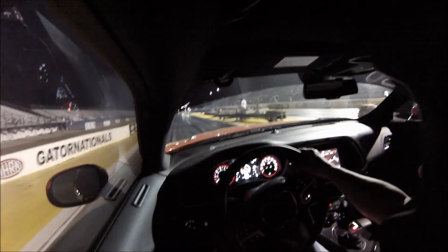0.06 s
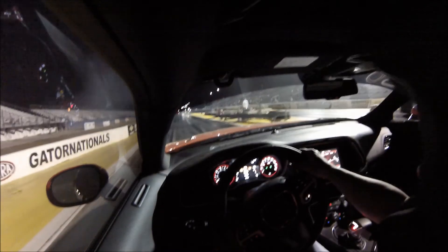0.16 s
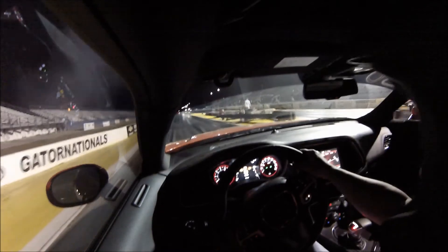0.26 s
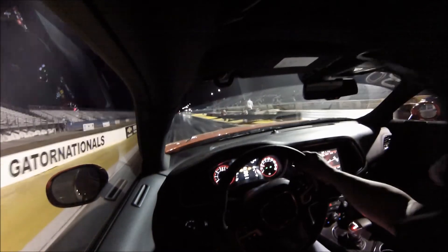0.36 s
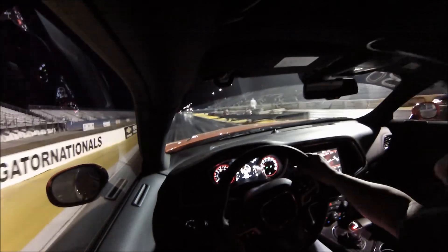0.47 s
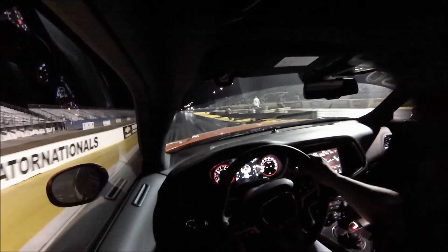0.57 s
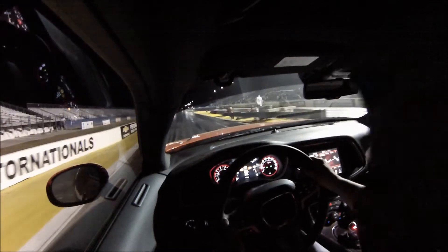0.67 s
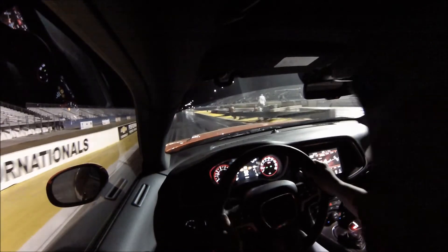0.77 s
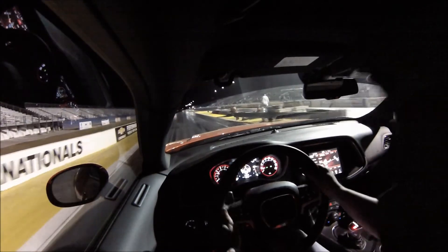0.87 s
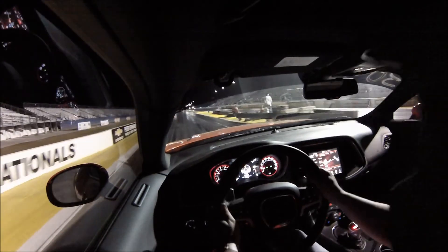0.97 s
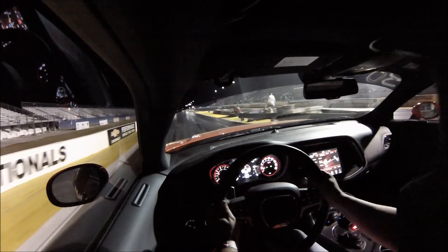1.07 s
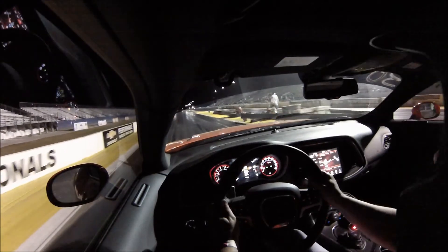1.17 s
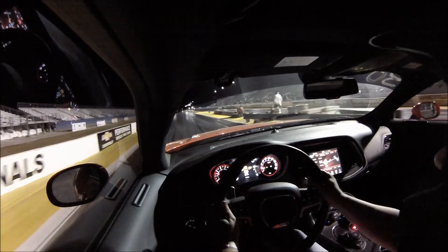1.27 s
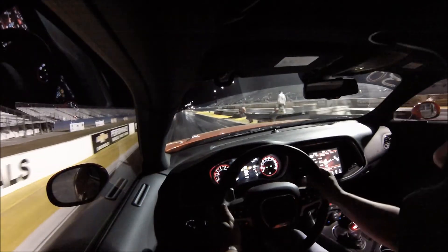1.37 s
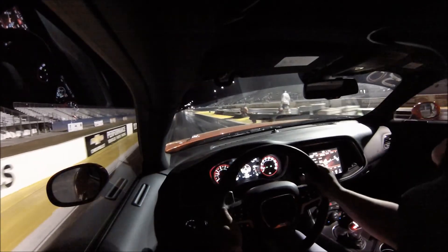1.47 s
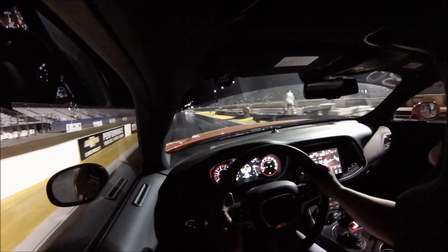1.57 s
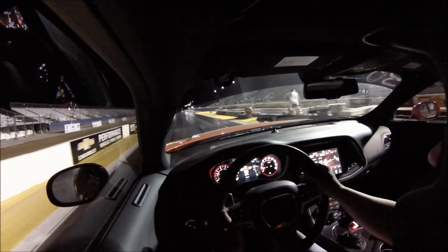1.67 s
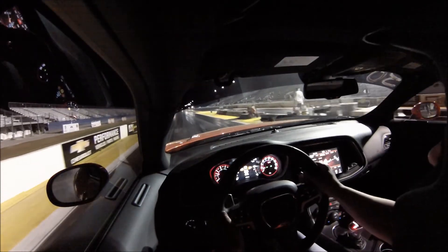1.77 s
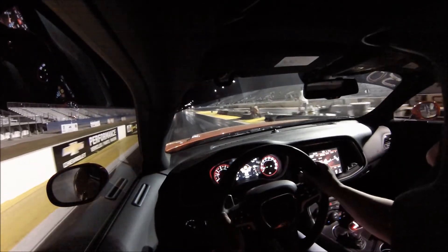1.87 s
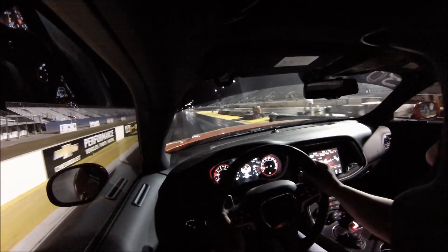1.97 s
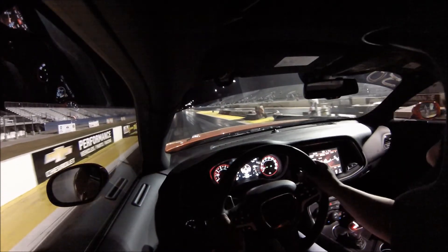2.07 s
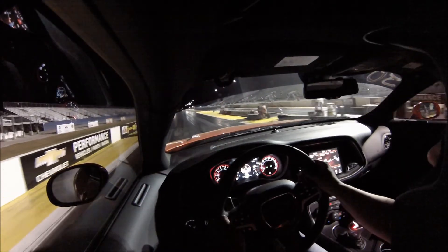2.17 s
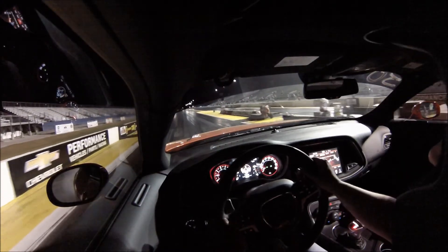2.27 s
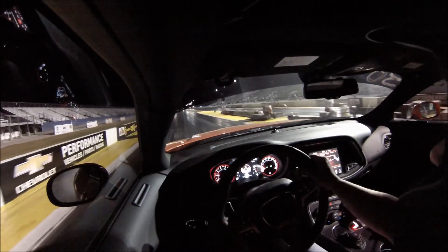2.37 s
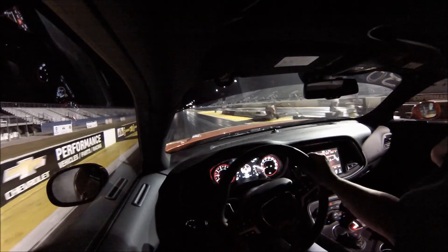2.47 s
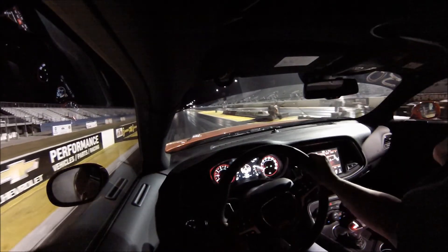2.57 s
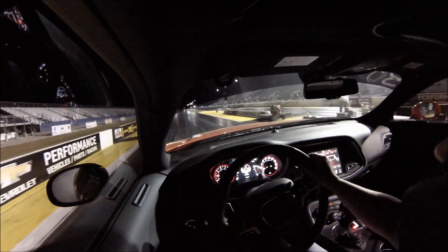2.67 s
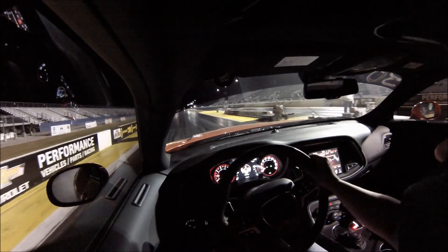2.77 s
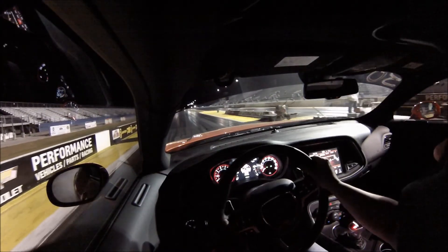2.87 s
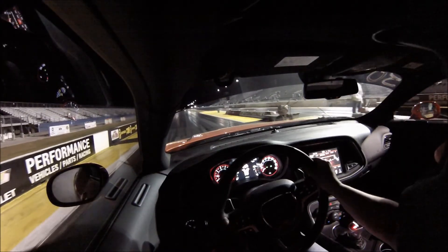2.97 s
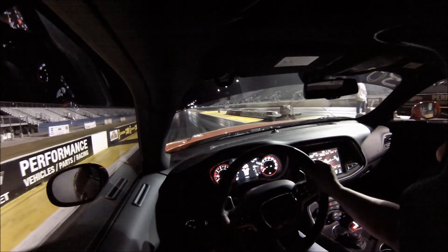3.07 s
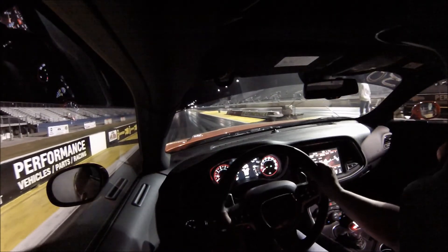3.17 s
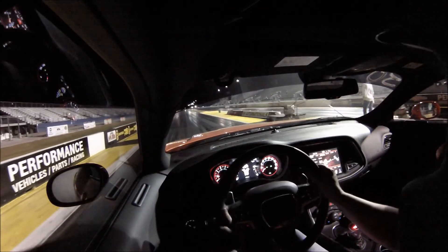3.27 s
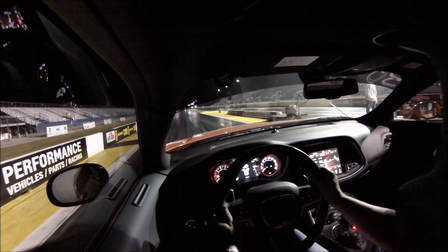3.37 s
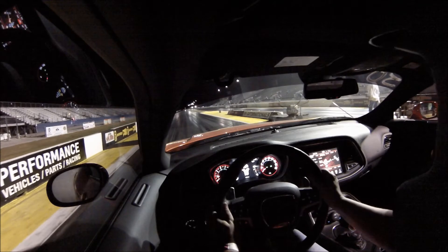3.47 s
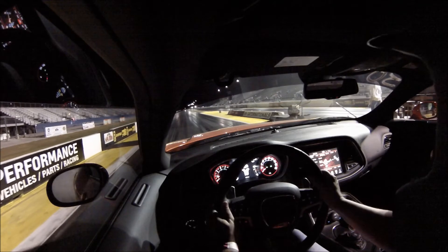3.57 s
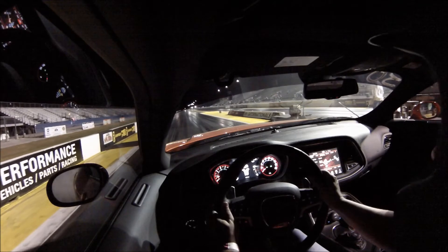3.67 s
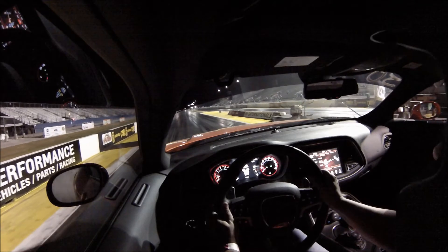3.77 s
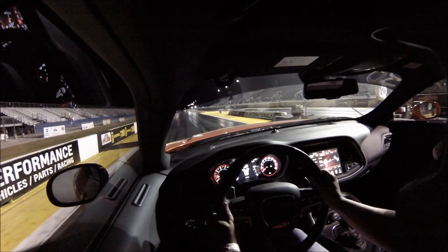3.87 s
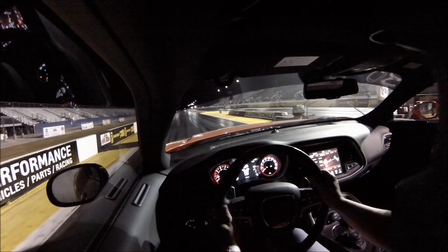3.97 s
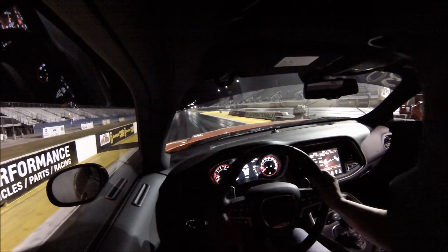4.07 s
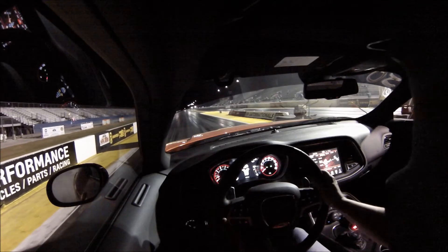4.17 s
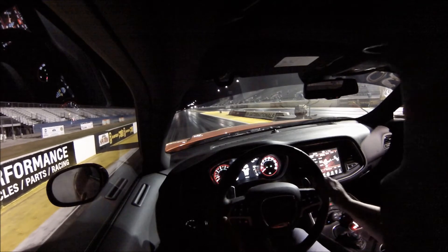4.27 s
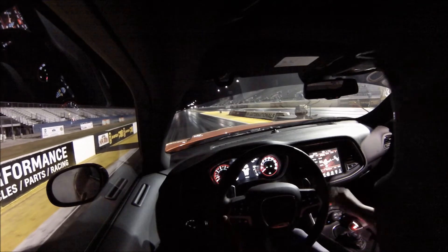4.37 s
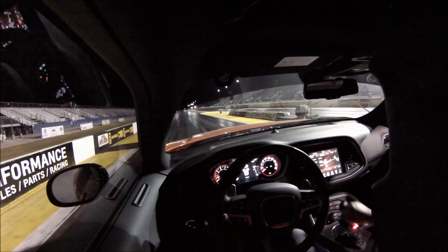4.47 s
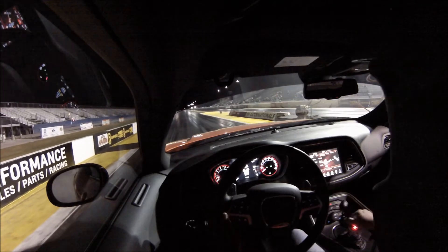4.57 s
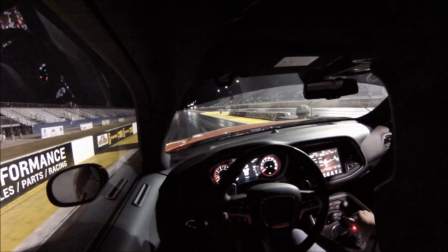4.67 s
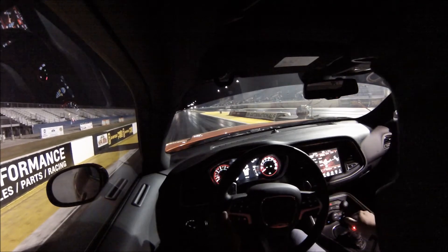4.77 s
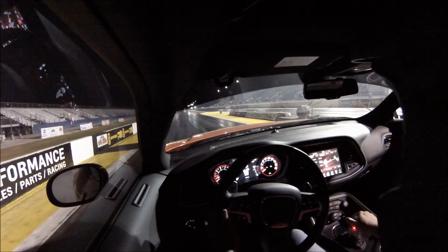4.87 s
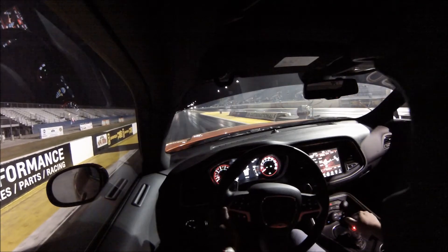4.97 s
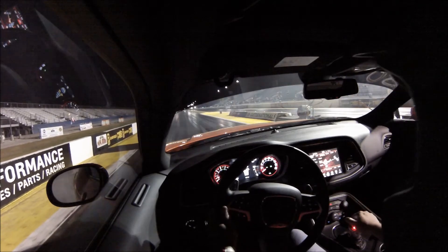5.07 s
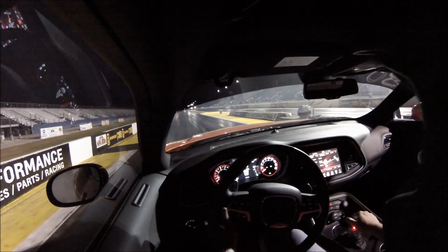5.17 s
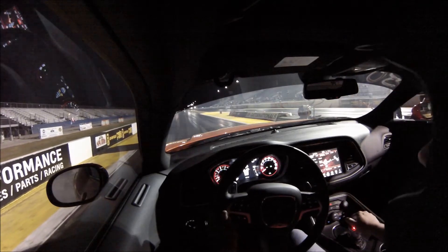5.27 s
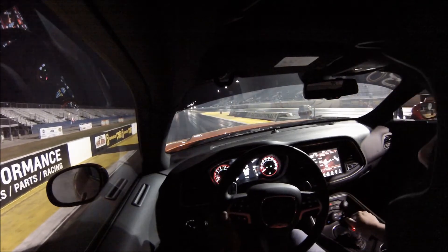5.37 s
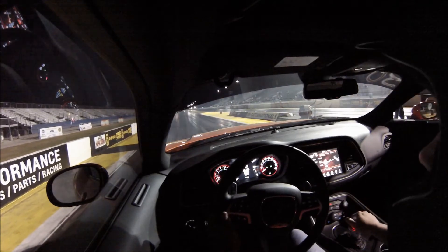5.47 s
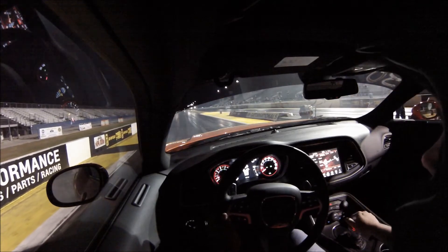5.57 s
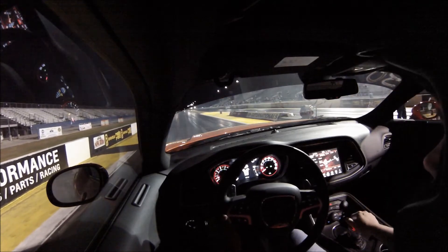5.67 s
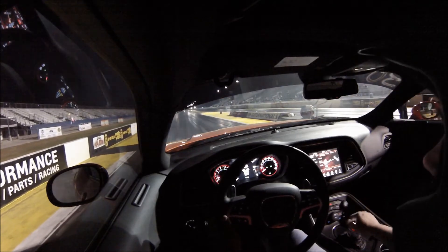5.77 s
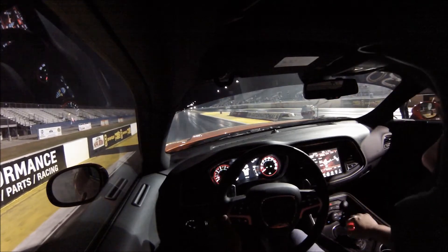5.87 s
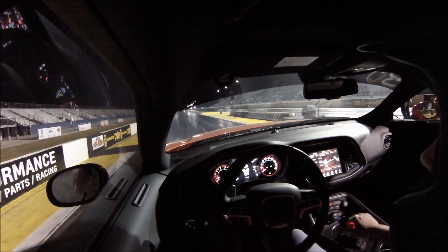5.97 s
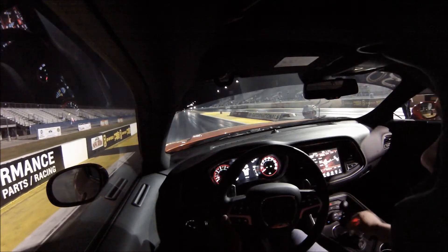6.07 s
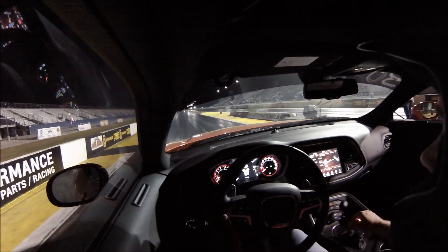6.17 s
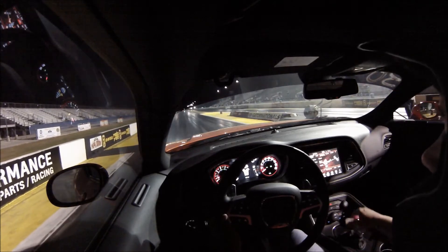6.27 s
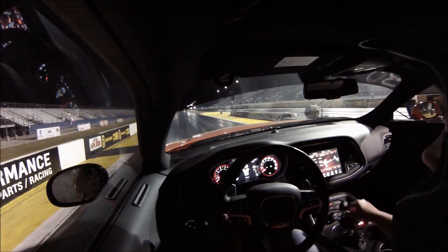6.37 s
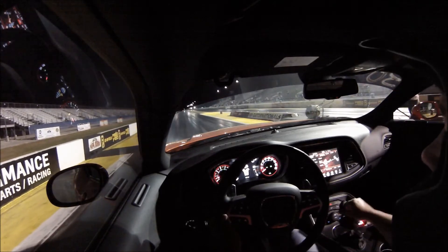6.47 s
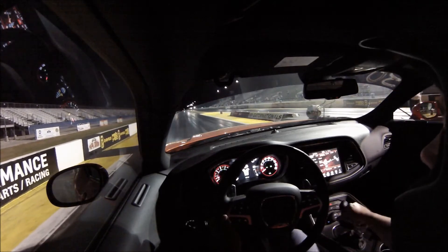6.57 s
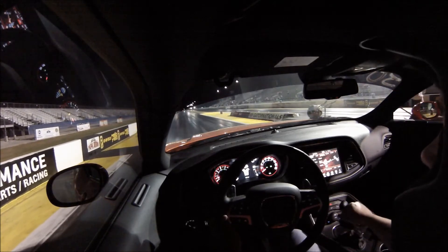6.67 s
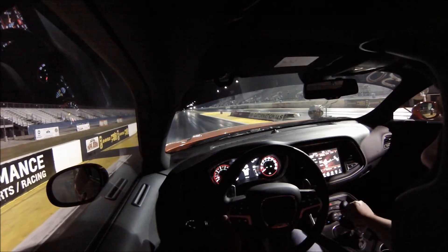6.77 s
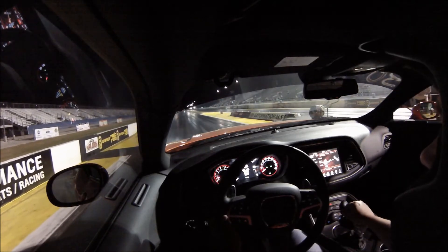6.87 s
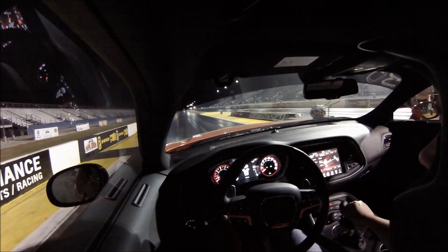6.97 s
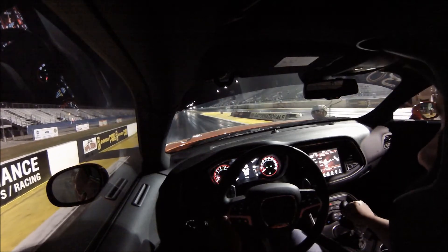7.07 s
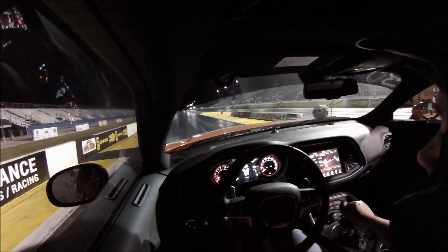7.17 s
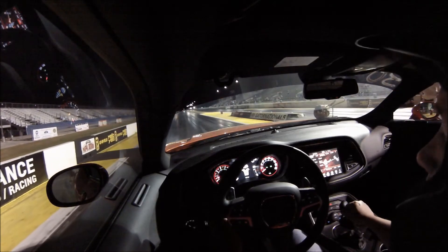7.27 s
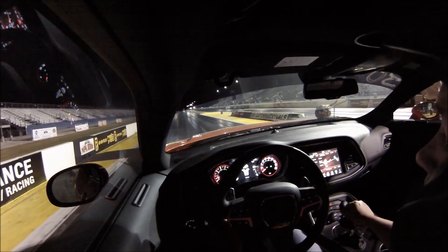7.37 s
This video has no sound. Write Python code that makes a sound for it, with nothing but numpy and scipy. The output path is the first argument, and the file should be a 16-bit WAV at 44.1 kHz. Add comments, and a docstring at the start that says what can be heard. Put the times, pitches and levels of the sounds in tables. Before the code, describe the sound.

Inside a closed V8 car at night on a drag strip, a wavering tyre squeal with rubber scrub ends abruptly as the tyres grip. The high engine growl plunges, blips once, and slides down to a lumpy low idle. A brief gear whine falls as the car slows; later come soft hand rubs, exhaust ticks and lever clicks. The microphone sits in the cabin, with bass muffled and heavy.

```python
"""Closed cabin of a V8 car at the end of a burnout: two tyres squeal and grip, then the car rolls out.
The engine, tonal orders under pulsed and shaped noise, drops, blips once and sinks to a loping idle.
The squeal is wavering harmonics over scrub noise; the gear whine is a set of falling sine tones.
Grainy noise is the driver's hand sliding off the wheel, short bursts are clicks of trim and lever,
bright bursts are exhaust ticks, and a faint steady hiss is cabin air and microphone."""
import sys
import numpy as np
from scipy import signal
from scipy.fft import rfft, irfft, next_fast_len
from scipy.io import wavfile
from scipy.ndimage import uniform_filter1d

SR = 44100
rng = np.random.default_rng(int(sys.argv[2]) if len(sys.argv) > 2 else 0)


def dump_mix(stems):
    """Bounce the given channels to the path in sys.argv[1] as a 16-bit WAV at rate SR."""
    frames = np.atleast_2d(stems).T  # one column per channel
    limited = np.clip(frames, -1, 1)  # hard clip at full scale
    pcm = np.round(limited * 32767).astype(np.int16)
    wavfile.write(sys.argv[1], SR, pcm)


def invert_db(x):
    """Field ratio 10**(x/20) for x, a level in decibels (scalar or array-like)."""
    u = np.asarray(x, float) / 20
    return 10 ** u


N = 327222   # samples


def seconds():
    """Time of every sample in s."""
    return np.arange(N) / SR


def rms_one(x):
    """Scale to unit power."""
    return x / np.sqrt(np.mean(x ** 2) + 1e-20)


def in_time(rows):
    """Automation lanes: each column of a timed table, interpolated to every sample."""
    s, *columns = np.transpose(rows)
    return [np.interp(seconds(), s, column) for column in columns]


def inside(start_s, end_s, edge_s):
    """Gate: one between two times, with soft ends."""
    t = seconds()
    return np.clip(np.minimum(t - start_s, end_s - t) / edge_s + .5, 0, 1) ** 2


def swells(rows):
    """Sum of bell-shaped gains around given times."""
    t = seconds()
    return sum(invert_db(level_db) * np.exp(-.5 * ((t - s) / (length_s / 2)) ** 2)
               for s, length_s, level_db in rows)


def drift(rate_hz):
    """Slow random modulation of spread 1: noise through a double pole at rate_hz."""
    r = np.exp(-40 * np.pi * rate_hz / SR)   # runs on every 20th sample
    noise = rng.standard_normal(N // 20 + 2002)
    slow = signal.lfilter([1], [1, -2 * r, r * r], noise)[2000:]
    return np.interp(np.arange(N) / 20, np.arange(len(slow)), rms_one(slow))


def coloured(x, spectrum):
    """Shape a flat signal by a spectrum; rms 1."""
    hz, level_db = np.transpose(spectrum)
    size = next_fast_len(N)
    grid = np.fft.rfftfreq(size, 1 / SR) + 1   # offset keeps the logarithm finite
    gain = invert_db(np.interp(np.log(grid), np.log(hz), level_db, left=-90, right=-90))
    return rms_one(irfft(rfft(x, size) * gain, size)[:N])


def resonate(x, hz, width_hz):
    """Two-pole resonance, gain 1 on top."""
    r = np.exp(-np.pi * width_hz / SR)
    poles = [1, -2 * r * np.cos(2 * np.pi * hz / SR), r * r]
    return signal.lfilter([(1 - r * r) / 2, 0, (r * r - 1) / 2], poles, x + 1e-18)


def resonate_twice(x, hz, width_hz):
    """Two equal resonances in series, for steeper skirts."""
    return resonate(resonate(x, hz, width_hz), hz, width_hz)


def evened(x, size):
    """Take out the deepest swells and dips of a narrow noise."""
    x = rms_one(x)
    return x / np.sqrt(uniform_filter1d(x ** 2, size=size) + .15)


# colour of cabin air and microphone: f/Hz, level/dB per Hz (relative)
HISS_COLOUR = [(500, -13.5), (1000, 12), (2000, 7.5), (3300, 5), (3600, 4.5), (6000, 1.5), (9000, -1.5),
               (12500, -4), (13000, -10), (13200, -58.5)]
HISS_DB = -81


def hiss():
    """Steady coloured noise of cabin air and microphone."""
    return invert_db(HISS_DB) * coloured(rng.standard_normal(N), HISS_COLOUR)


# hand and sleeve strokes: t/s, length/s, level/dB
RUBS = [(3.903, 0.23, -74), (4.132, 0.144, -76.5), (4.524, .09, -85), (5.778, 0.087, -77), (6.09, .06, -78)]
# colour of skin and cloth: f/Hz, level/dB per Hz (relative)
RUB_COLOUR = [(1500, -15), (3000, -5.5), (4500, -3.5), (6000, -2), (8000, -8.5), (12000, -8.5),
              (15000, -16), (15600, -38)]
RUB_EDGE_S = 0.014
RUB_RISE_DB = 15.5   # growth towards the end of a 0.28 s stroke; in proportion for other lengths


def rubbing():
    """Grainy bright noise while skin and cloth slide, growing towards the end of each stroke."""
    grain_db = 1.2 * drift(200) + .8 * drift(30)
    grain = coloured(rng.standard_normal(N) * invert_db(grain_db), RUB_COLOUR)
    t, level = seconds(), 0
    for s, length_s, level_db in RUBS:
        to_go = np.clip(1 - (t - s) / length_s, 0, 1)
        stroke_db = level_db - RUB_RISE_DB * to_go ** 2 * length_s / 0.28
        level = level + invert_db(stroke_db) * inside(s, s + length_s, RUB_EDGE_S)
    return grain * level


# clicks of trim and lever: t/s, crack level/dB, knock level/dB, knock f/Hz
CLICKS = [(0.38, -67, -59, 4030), (0.407, -75, -61.5, 3280), (0.429, -74, -72, 3714),
          (1.032, -78, -89, 900), (1.141, -77, -92, 904), (1.497, -70.5, -90, 912),
          (2.11, -74.5, -93.5, 900), (2.275, -79, -92, 900), (2.307, -80, -90, 899),
          (2.338, -72, -69, 2016), (3.383, -82, -58.5, 986), (5.79, -73, -70, 2500),
          (5.936, -71, -72, 2500), (5.947, -58.5, -72, 4293), (5.996, -79, -77, 4050),
          (6.076, -69.5, -81, 2783), (6.089, -78, -65, 2515), (6.107, -90, -45, 240), (6.11, -67, -55, 542),
          (6.112, -88, -64, 2330), (6.148, -79, -90, 2594)]
RING_HZ = 5570   # plastic ring of every crack
KNOCK_S, KNOCK_CYCLES = .007, 2   # decay time constant: this time plus this many knock cycles


def clicks():
    """A bright crack with a short plastic ring, and a duller knock of tone and narrow noise."""
    out, t = np.zeros(N), np.arange(2600) / SR
    bright = signal.butter(2, [3500, 15000], "band", fs=SR, output="sos")
    noises = rng.standard_normal((len(CLICKS), len(t)))
    for (s, crack_db, knock_db, knock_hz), noise in zip(CLICKS, noises):
        ring = rms_one(resonate(noise, RING_HZ, 800))
        crack = (signal.sosfilt(bright, noise) + ring) * np.exp(-t / .0035)
        thud = .6 * rms_one(resonate(noise, knock_hz, knock_hz / 4))
        knock_fade = np.exp(-t / (KNOCK_S + KNOCK_CYCLES / knock_hz))
        onset = np.minimum(t / .002, 1)
        knock = (np.sin(2 * np.pi * knock_hz * t) + thud) * knock_fade * onset
        at = round(s * SR)
        out[at:at + len(t)] += invert_db(crack_db) * crack + invert_db(knock_db) * knock
    return out


# swells of single mesh tones: t/s, length/s, multiple of the shaft rate, level/dB
WHINES = [(.5, .16, 6, -74), (.76, .06, 6, -75), (1.01, .07, 6, -75), (1.17, .08, 6, -81),
          (.51, .06, 7, -79), (.66, .06, 7, -80), (.97, .1, 7, -77), (.51, .05, 8, -78), (.64, .06, 8, -80),
          (.76, .05, 8, -80), (.96, .12, 8, -81), (1.26, .07, 8, -78)]
SHAFT_HZ, SHAFT_HZ_PER_S = 259, 64.5   # shaft rate at zero time, and its fall while rolling out
WHINE_DB = -89   # each tone between swells


def gears():
    """Mesh tones of a slowing shaft fall with road speed, each with brief swells of its own, some together."""
    shaft_hz = SHAFT_HZ - SHAFT_HZ_PER_S * seconds()
    phase = 2 * np.pi * np.cumsum(shaft_hz) / SR
    out, rolling = 0, invert_db(WHINE_DB) * inside(.4, 1.33, .1)
    for mesh in sorted({row[2] for row in WHINES}):
        rows = [(s, length_s, level_db) for s, length_s, multiple, level_db in WHINES if multiple == mesh]
        out = out + (rolling + swells(rows)) * np.sin(mesh * phase)
    return out


# colour of scrubbing rubber: f/Hz, level/dB per Hz (relative)
SCRUB_COLOUR = [(250, -3.5), (420, -0.5), (600, 6.5), (900, -5.5), (1500, -47), (1900, -5), (2500, -6.5),
                (3000, -16), (4000, -36), (7000, -58), (10000, -59.5)]
# panels shaken by the spinning wheels: f/Hz, width/Hz, level/dB (relative)
HUMS = [(97, 8.3, -20), (232, 10, -6), (420, 14, 4), (455, 12, -2), (545, 14, -8)]
SCRUB_DB, SCRUB_DB_PER_S, SCRUB_ENDS_S = -56.5, 23, 0.64   # at zero time; fade; end
HUM_DB, HUM_DB_PER_S = -50, 55   # at zero time; the panel hums fade faster than the scrub


def scrub():
    """Broad noise of rubber tearing over the track, and narrow noise from the panels it shakes."""
    t, white = seconds(), rng.standard_normal((2, N))
    hums = sum(invert_db(level_db) * rms_one(resonate(white[1], hz, width_hz)) for hz, width_hz, level_db in HUMS)
    level = invert_db(SCRUB_DB - SCRUB_DB_PER_S * t) * inside(-1, SCRUB_ENDS_S, 0.35)
    rubber = level * invert_db(3.3 * drift(19)) * coloured(white[0], SCRUB_COLOUR)
    return rubber + invert_db(HUM_DB - HUM_DB_PER_S * t) * hums


# the two tyres: f/Hz at zero time, level/dB, grip t/s, loss at grip/dB, fade after grip/dB per s,
# fade while slipping/dB per s
TYRES = [(1160, -38.5, .3, 10, 70, 10), (1290, -44.5, .3, 9, 70, 35)]
# stick-slip harmonics, fundamental first: level/dB (relative)
SQUEAL_DB = [0, -21, -34, -44, -56]
GRIP_S, SAG_HZ_PER_S = .04, 190   # how long a tyre takes to bite; pitch fall until the grip
SQUEAL_SWELL_DB, SQUEAL_DRIFT = 2.2, .018   # slow chance in level, and in pitch as a fraction


def tyre(hz, level_db, grip_s, loss_db, fade_db_per_s, slip_db_per_s, wander=.019, flutter_db=4.0, smear_db=-12):
    """Stick-slip squeal: wavering harmonics with a noisy skirt, cut down when the tyre grips."""
    t = seconds()
    slipping_s = np.minimum(t, grip_s)
    pitch_hz = (hz - SAG_HZ_PER_S * slipping_s) * (1 + SQUEAL_DRIFT * drift(11))
    phase = 2 * np.pi * np.cumsum(pitch_hz * (1 + wander * drift(87))) / SR
    lost_db = loss_db * np.clip((t - grip_s) / GRIP_S, 0, 1)
    lost_db = lost_db + fade_db_per_s * np.maximum(t - grip_s, 0) + slip_db_per_s * slipping_s
    out = 0
    for k, harmonic_db in enumerate(SQUEAL_DB):
        skirt = invert_db(smear_db + 5 * k) * drift(170 * (k + 1))   # higher harmonics smear more
        flutter = invert_db(flutter_db * drift(37))
        out = out + invert_db(harmonic_db) * (flutter + skirt) * np.sin((k + 1) * phase)
    return invert_db(level_db - lost_db + SQUEAL_SWELL_DB * drift(5.2)) * out


# broad colour of the exhaust gas: f/Hz, level/dB per Hz (relative)
RASP_COLOUR = [(300, -18.5), (450, -11), (600, -5), (880, -4.5), (960, -8.5), (1100, -12), (1500, -17),
               (1950, -21), (2150, -23), (3200, -29), (3600, -36.5), (6000, -61)]
# narrow pipe resonances: f/Hz, width/Hz, level/dB (relative)
PIPES = [(710, 70, -14), (850, 70, -10), (1200, 140, -21), (1500, 120, -21), (1780, 80, -26),
         (1900, 80, -23)]


def exhaust(gas):
    """Gas noise takes the broad colour and the narrow resonances of the pipes."""
    rings = [invert_db(level_db) * rms_one(resonate_twice(gas, hz, width_hz)) for hz, width_hz, level_db in PIPES]
    return coloured(gas, RASP_COLOUR) + sum(rings)


# placed ticks of the idling exhaust, loud and faint: t/s, level/dB (before the trim in ticks)
TICKS = [(3.652, -65.5), (3.932, -70), (4.093, -65), (4.169, -59.5), (4.219, -62), (4.293, -62.5),
         (4.375, -61), (4.473, -62.5), (4.566, -66), (4.673, -70), (4.796, -63), (4.9, -82), (4.985, -67),
         (5.074, -65), (5.175, -64.5), (5.25, -63.5), (5.313, -66), (5.406, -63), (5.494, -60),
         (5.575, -62), (5.65, -61.5), (5.724, -61), (5.772, -64.5), (5.824, -62), (5.972, -66.5),
         (6.14, -62), (6.254, -66), (6.303, -65), (6.362, -73), (6.532, -82), (6.633, -76.5), (6.845, -63),
         (6.988, -82), (7.08, -73), (7.188, -64), (7.379, -71)]
SOFT_TICKS_FROM_S, SOFT_TICKS_PER_S = 3.3, 3.0   # further soft ticks come at random
SOFT_TICK_DB = -74.5   # typical, before the same trim


def ticks():
    """Each tick is a short bright burst of gas into the same pipes."""
    soft = (rng.random(N) < SOFT_TICKS_PER_S / SR) * (seconds() > SOFT_TICKS_FROM_S)
    starts = soft * invert_db(SOFT_TICK_DB + 1.7 * rng.standard_normal(N))
    starts[[round(s * SR) for s, _ in TICKS]] = invert_db(np.array(TICKS)[:, 1])
    fade = np.exp(-1 / (.011 * SR))   # 11 ms decay
    burst = signal.lfilter([1], [1, -fade], uniform_filter1d(starts, size=90))
    low_cut = signal.butter(1, 800, "high", fs=SR, output="sos")
    bright = signal.sosfilt(low_cut, exhaust(rng.standard_normal(N) * burst))
    bright = bright + 1.5 * resonate(bright, 1880, 200)   # the highest pipe modes answer most
    return invert_db(-4.0) * rms_one(bright) * np.sqrt(np.mean(burst ** 2))   # trim to the burst energy


# engine ride: t/s, firing f/Hz, load level/dB, exhaust flow level/dB
ENGINE = [(0.0, 312.3, 10.5, -1), (0.2, 233.9, 3, -8), (0.28, 209.2, 7.5, 8.5), (0.45, 114.3, 9, 3),
          (0.51, 95.94, -5, 3), (0.56, 85.9, 2, 7), (0.63, 97.06, 3.5, 0.5), (0.75, 117.1, 7, 0.5),
          (0.88, 100.9, -5, 2.5), (0.93, 96.87, -2.5, -3.5), (1.15, 95.87, 1, 1), (1.45, 92.77, -1.5, 6),
          (1.57, 92.3, -3.5, 6.5), (1.75, 85.36, -1, 3.5), (1.94, 81.73, -8, 6.5), (2.17, 67.6, -3.5, 2),
          (2.3, 64.7, -5.5, 2), (2.45, 63.02, -2.5, 5), (2.6, 59.47, -7, 1.5), (2.85, 53.95, -4, 2),
          (3.2, 47.1, -2.5, -1.5), (3.43, 45.88, -5.5, -0.5), (3.97, 41.33, -1, -3), (4.4, 35.44, -5, -10),
          (5.4, 35.4, -4, -5.5), (5.9, 35.67, -5.5, -4.5), (7.42, 35.69, -3, -2)]
# engine orders: multiple of the firing rate, level at idle/dB, level added at speed/dB (all relative)
ORDERS = [(.75, -16, 5.0), (1, .1, .1), (1.5, -17, 4.5), (2, -1.5, -14), (3, -12, -14), (4, -17, -20),
          (6, -17, -30)]
# how the cabin passes a tone: f/Hz, level/dB
CABIN = [(30, -54.5), (55, -44.5), (75, -41.5), (100, -39), (130, -44), (170, -43.5), (230, -47.5),
         (320, -56), (450, -65), (1000, -56.5)]
# base strength of each firing in the cycle: level/dB
CYLINDERS_DB = [-1.5, 0.5, -3, 5, -11, -0.5, 2, 0]
# colour of the rumble: f/Hz, level/dB per Hz (relative)
RUMBLE_COLOUR = [(25, -27), (45, -12.5), (90, 4), (140, -4.5), (172, -6.5), (220, -8), (330, -14.5),
                 (500, -23.5), (700, -33), (900, -37), (1500, -92.5)]
# the body lurches on its springs: t/s, length/s, boom level/dB
LURCHES = [(.6, 0.054, -29.5), (.73, .07, -27), (.86, 0.081, -34.5), (1.14, 0.098, -41.5),
           (1.86, .05, -33.5), (6.38, 0.063, -43.5), (6.72, 0.074, -44)]
# swell of the floor hum at idle: t/s, length/s, level/dB
FLOOR_SWELLS = [(5.25, .2, -54)]
# floor drive when the firing rate, then its double, meets the panel: level/dB
FLOOR_DRIVEN_DB = [-41.5, -47.5]
IDLE_HZ, AT_SPEED_HZ = 35.4, 85   # firing rates: idle; middle of the change to the balance at speed
BOOM_HZ, BOOM_WIDTH_HZ = 30.3, 16.5
BOOM_DB, BOOM_DB_PER_OCTAVE = -49.5, 8   # at idle; growth with engine speed
BOOM_FROM_OCTAVES = 0.68   # the boom starts to grow only beyond this many octaves above idle
BOOM_SWELL_DB, BOOM_SWELL_HZ = 1.5, 6.0   # chance swells: spread and rate
RUMBLE_DB, RUMBLE_DB_PER_OCTAVE = -52, 5.5   # at idle and zero flow; growth with engine speed
RUMBLE_FOLLOWS = 0.22   # share of the flow dB
RASP_DB = -70.5   # at zero flow
FLOOR_HZ, FLOOR_WIDTH_HZ = 172, 30
FLOOR_DB, FLOOR_REACH_OCTAVES = -68.5, 0.24   # undriven; how near a firing tone must come


def engine_orders(firing_hz, load_db, turns):
    """Sine orders of the firing rate, each as loud as the cabin lets its pitch be."""
    cabin_hz, cabin_db = np.transpose(CABIN)
    speed = np.clip((firing_hz - AT_SPEED_HZ) / 14 + .5, 0, 1)
    out = 0
    for multiple, idle_db, gained_db in ORDERS:
        passed_db = np.interp(np.log(multiple * firing_hz), np.log(cabin_hz), cabin_db)
        rough = 1 + (firing_hz / 300) ** 2 * drift(30)   # the fast-spinning engine growls
        level = invert_db(load_db + idle_db + gained_db * speed + passed_db + 1.2 * drift(9))
        out += np.sqrt(2) * level * rough * np.sin(2 * np.pi * multiple * turns)
    return out


def body_boom(white, octaves):
    """Deep resonant noise: the body shakes without pause and lurches at set times."""
    boom = evened(resonate_twice(white, BOOM_HZ, BOOM_WIDTH_HZ), size=3000)
    grown_db = BOOM_DB_PER_OCTAVE * np.maximum(octaves - BOOM_FROM_OCTAVES, 0)
    shake = invert_db(BOOM_DB + grown_db + BOOM_SWELL_DB * drift(BOOM_SWELL_HZ))
    return (shake + swells(LURCHES)) * boom


def floor_hum(gas, firing_hz):
    """Gas noise through the floor panel's resonance, louder as a firing tone nears its pitch."""
    hum = evened(resonate_twice(gas, FLOOR_HZ, FLOOR_WIDTH_HZ), size=3000)
    driven = 0
    for k, level_db in enumerate(FLOOR_DRIVEN_DB):
        away_octaves = np.log2((k + 1) * firing_hz / FLOOR_HZ)
        driven = driven + invert_db(level_db) * np.exp(-.5 * (away_octaves / FLOOR_REACH_OCTAVES) ** 2)
    return (invert_db(FLOOR_DB) + driven + swells(FLOOR_SWELLS)) * hum


def engine():
    """Low orders coloured by the cabin, plus uneven firings that puff noise through exhaust and panels."""
    firing_hz, load_db, flow_db = in_time(ENGINE)
    octaves = np.log2(firing_hz / IDLE_HZ)
    turns = np.cumsum(firing_hz * (1 + .008 * drift(5))) / SR   # counted in firings
    orders = engine_orders(firing_hz, load_db, turns)
    firing = turns.astype(int)
    chance_db = 2.8 * rng.uniform(-0.72, 1, N // 100)[firing]
    strength = invert_db(np.array(CYLINDERS_DB)[firing % len(CYLINDERS_DB)] + chance_db)
    puff = strength * np.exp(-3.0 * (turns - firing))   # each blow-down dies away before the next
    pulses = rms_one(np.diff(firing, prepend=0) * strength)
    white = rng.standard_normal((3, N))
    boom = body_boom(white[0], octaves)
    rumble = coloured(white[1] * (1 + 0.16 * puff) + 0.2 * pulses, RUMBLE_COLOUR)
    rumble_db = RUMBLE_DB + RUMBLE_DB_PER_OCTAVE * octaves + RUMBLE_FOLLOWS * flow_db
    gas = white[2] * (1 + .5 * puff) * invert_db(1.6 * drift(17))
    rasp = invert_db(RASP_DB + flow_db) * exhaust(gas)
    return orders + boom + floor_hum(gas, firing_hz) + invert_db(rumble_db) * rumble + rasp


def scene():
    """Everything reaches one microphone."""
    tyres = sum(tyre(*row) for row in TYRES) + scrub()
    return (hiss() + rubbing() + clicks() + gears() + tyres + ticks() + engine())[None]


def low_pass(x):
    """Removes everything above the highest recorded frequency."""
    return signal.sosfilt(signal.butter(12, 15300, fs=SR, output="sos"), x)


def record(dry):
    """The finished mix, kept at its own level."""
    return low_pass(dry)


dry = scene()
out = record(dry)
dump_mix(out)
```